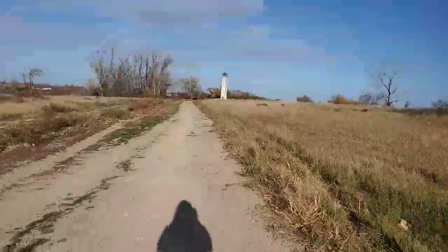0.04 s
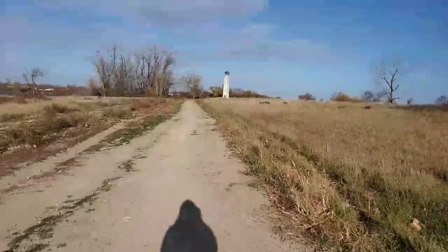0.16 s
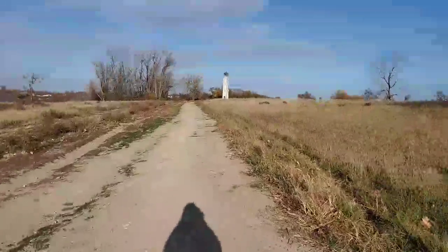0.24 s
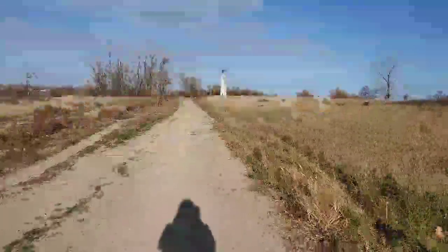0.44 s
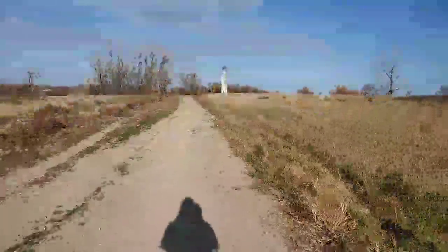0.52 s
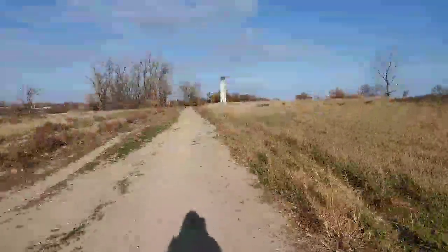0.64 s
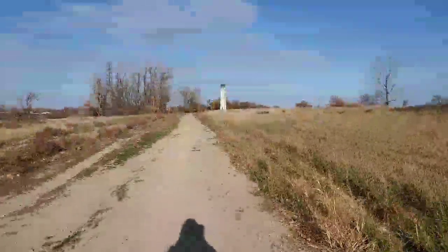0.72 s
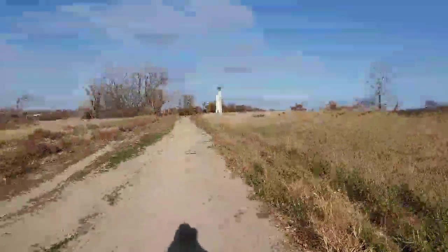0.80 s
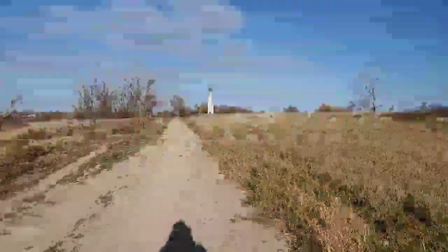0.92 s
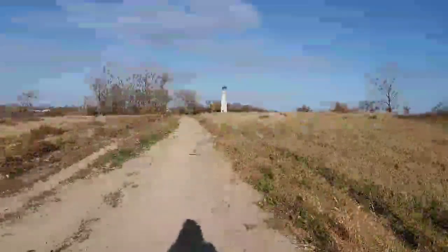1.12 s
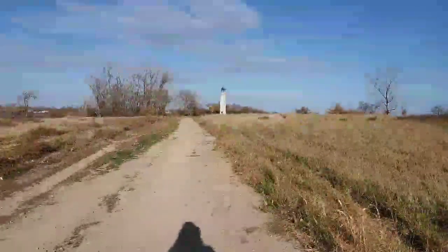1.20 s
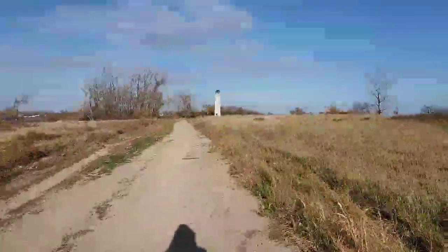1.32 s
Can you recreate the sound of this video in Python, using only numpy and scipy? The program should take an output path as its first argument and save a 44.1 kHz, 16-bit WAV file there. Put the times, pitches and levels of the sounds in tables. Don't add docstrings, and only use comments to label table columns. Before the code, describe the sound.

Gusty wind rumbles, flutters and thumps on a handheld stereo microphone outdoors, jumping between sides, while shoes scrape sandy grit beneath; a stone cracks sharply midway, then the wind drops to faint grass hiss and a last scuff.

```python
import sys
import numpy as np
from scipy import signal
from scipy.fft import rfft, irfft, next_fast_len
from scipy.io import wavfile
from scipy.ndimage import uniform_filter1d

SR = 44100
rng = np.random.default_rng(int(sys.argv[2]) if len(sys.argv) > 2 else 0)


def master_out(mix):
    frames = np.transpose(np.atleast_2d(mix))
    ceiling = np.clip(frames, -1, 1)
    pcm = np.round(ceiling * 32767).astype(np.int16)
    wavfile.write(sys.argv[1], SR, pcm)


def how_loud(loudness_db):
    steps = np.asarray(loudness_db, float) / 20
    return 10 ** steps


N = 59535


def evened(x):
    return x / np.sqrt(np.mean(x ** 2) + 1e-20)


def colour(x, points):
    size = next_fast_len(x.shape[-1] + 4096)
    f, level = np.transpose(points)
    hz = np.fft.rfftfreq(size, 1 / SR)
    gain = how_loud(np.interp(np.log(hz + 1), np.log(f + 1), level))
    return irfft(rfft(x, size) * gain, size)[..., :x.shape[-1]]


def curve(table, col):
    rows = np.array(table)
    return np.interp(np.arange(N) / SR, rows[:, 0], rows[:, col])


def slow(hz):
    noise = rng.standard_normal((2, N))
    return evened(colour(noise, [(1, 0), (hz, -3), (4 * hz, -40), (20000, -150)]))


def lean(db):
    half = np.asarray(db) / 2
    return how_loud(np.array([half, -half]))


def add(mix, s, sound):
    part = mix[:, max(round(s * SR), 0):][:, :sound.shape[1]]
    part += sound[:, :part.shape[1]]


def ring(x, hz, width):
    r = np.exp(-np.pi * width / SR)
    angle = 2 * np.pi * hz / SR
    return signal.lfilter([np.sin(angle)], [1, -2 * r * np.cos(angle), r * r], x)


def wind():
    # (time [s], gust level [dB], left-right lean [dB], rumble over tone [dB])
    gusts = [(0, -55.5, 7, 19), (.022, -39.5, -17, -13), (.13, -42, -15, -4), (.176, -40.5, 3, 4),
             (.235, -34, -24, -20), (.33, -32.5, 12, 3), (.39, -31.5, -18, -0.5), (.435, -41, 17, 3),
             (.52, -42, -11.5, 9), (.608, -41, 18, 3), (.69, -32.5, 7, 0.5), (.79, -44.5, -13, 13.5),
             (.85, -43.5, 17, 5.5), (.9, -65.5, 14, 10), (.96, -51.5, 15, 3), (1.01, -62.5, -5, 16),
             (1.05, -72, -26.5, -4.5), (1.35, -78.5, -9.5, 12)]
    # (frequency [Hz], level [dB])
    port_tone = [(90, -52), (150, -6.5), (300, 0.5), (400, 0.5), (560, -8), (1000, -20), (2000, -35),
                 (4000, -71)]
    # (frequency [Hz], level [dB])
    rumble = [(20, -18), (35, -13), (65, -2), (100, -4.5), (160, -7.5), (260, -16.5), (500, -69)]
    flutter_db, lump_db, rumble_db = 3.5, 2.5, -2
    tone = evened(colour(rng.standard_normal((2, N)), port_tone))
    tone *= how_loud(flutter_db * slow(hz=28.8) + 3.5)
    low = evened(colour(rng.standard_normal((2, N)), rumble))
    low *= how_loud(lump_db * slow(hz=35.8) + rumble_db + curve(gusts, col=3))
    side = curve(gusts, col=2)
    return how_loud(curve(gusts, col=1)) * (tone * lean(.2 * side) + low * lean(.8 * side))


def lumps(tables, cycles, skirt_db):
    out, t = np.zeros((2, N)), np.arange(-1500, 1500) / SR
    middle = len(t) // 2
    for port, table in enumerate(tables):
        for s, db, hz in table:
            phase = rng.random()
            skirt = [(hz / 2, -20), (hz, 0), (2.11 * hz, -3), (6 * hz, -35), (30 * hz, -90)]
            rough = evened(colour(rng.standard_normal(len(t)), skirt))
            swell = np.exp(-(t * hz / cycles) ** 2)
            lump = swell * (np.cos(2 * np.pi * (hz * t + phase)) + how_loud(skirt_db) * rough)
            first = round(s * SR) - middle
            start = max(first, 0)
            add(out[port:port + 1], start / SR, how_loud(db) * lump[None, start - first:])
    return out


def thumps():
    # (time [s], peak level [dB], frequency [Hz])
    left_thumps = [(0.005, -37, 70), (0.08, -44, 70), (0.18, -35, 78.4), (0.34, -22, 89), (.35, -16, 151),
                   (0.3851, -26, 60), (0.485, -21.5, 103), (0.56, -24.5, 62), (0.655, -19.5, 74.4),
                   (0.7381, -27, 94), (0.80, -29, 78), (0.8386, -30, 60), (.9, -41, 70), (0.9968, -41, 80),
                   (1.135, -47, 73), (1.245, -71, 60), (1.34, -57, 65)]
    right_thumps = [(0.0268, -29.5, 55), (0.082, -29, 63), (0.15, -29, 73), (0.233, -23, 63.6),
                    (0.289, -29, 54), (0.374, -22, 86.5), (0.371, -20, 192), (0.494, -24.5, 110),
                    (0.556, -28, 64.5), (0.649, -25.5, 75), (0.721, -21.5, 57.7), (0.781, -30, 68),
                    (.992, -39.5, 66), (1.09, -52, 54), (1.259, -51.5, 60.7), (1.33, -53, 84)]
    return how_loud(-2.5) * lumps([left_thumps, right_thumps], cycles=1.16, skirt_db=-8.5)


def eddies():
    # (time [s], peak level [dB], frequency [Hz])
    left_eddies = [(0.0124, -27.5, 404), (0.198, -20, 597), (0.2296, -15.5, 438), (0.2381, -17.5, 433),
                   (0.3485, -18, 394), (0.3645, -2, 374), (0.47, -15.5, 375), (0.4817, -26, 380),
                   (0.4915, -28, 320), (0.5256, -27.5, 656), (0.6361, -19.5, 290), (0.644, -18.5, 560),
                   (0.6548, -10.5, 382), (0.668, -18.5, 524), (0.6787, -7, 300), (0.6876, -14, 370),
                   (0.7651, -20, 350), (.6942, -15, 446)]
    right_eddies = [(0.2284, -16.5, 390), (0.2461, -20, 530), (0.2792, -20, 420), (0.2991, -18.5, 337),
                    (0.3459, -13.5, 374), (0.358, -9.5, 430), (0.3664, -10.5, 347), (0.3732, -11, 378),
                    (0.3867, -32, 364), (0.4829, -15.5, 340), (0.4926, -18, 363), (0.5246, -20, 543),
                    (0.6465, -12, 447), (0.6671, -11, 410), (0.6783, -11, 360), (0.686, -22, 293),
                    (0.7751, -20, 281), (.6725, -7, 370)]
    return how_loud(-0.5) * lumps([left_eddies, right_eddies], cycles=1, skirt_db=-14.5)


def flicks():
    # (time [s], peak level [dB], frequency [Hz])
    left_flicks = [(.075, -32, 487), (.092, -27.5, 590), (.204, -18.5, 600), (.347, -24, 900),
                   (.4915, -22, 654), (.64, -24, 790), (.66, -26, 750), (.7665, -33, 600)]
    right_flicks = [(.094, -27.5, 580), (.128, -42, 1000), (0.21, -21.5, 590), (.429, -30, 620),
                    (.583, -31.5, 550), (.278, -21.5, 530), (.6445, -23.5, 1130), (.59, -33, 690),
                    (0.66, -40, 950), (.879, -31.5, 630)]
    return lumps([left_flicks, right_flicks], cycles=1.26, skirt_db=-15.5)


def sand():
    # (time [s], level [dB])
    scuff = [(0, -63), (.06, -59.5), (.19, -60.5), (.23, -56.5), (.37, -55), (.42, -62.5), (.63, -62),
             (.66, -55), (.69, -66), (.86, -66), (.91, -65.5), (.99, -62), (1.03, -77.5), (1.3, -76),
             (1.35, -56)]
    # (frequency [Hz], level [dB])
    sand_spectrum = [(530, -14.5), (900, -21.5), (2040, -16), (2630, -21), (3150, -17), (4980, -19.5),
                     (7960, -20), (14500, -24), (16000, -59.5)]
    grains_per_s, grain_db = 2700, -11.5
    same = 0.066
    a, b = rng.standard_normal((2, N))
    hiss = np.array([a, same * a + np.sqrt(1 - same ** 2) * b])
    grains = (rng.random(N) < grains_per_s / SR) * rng.choice([-1, 1], N)
    grains = grains * how_loud(6.0 * np.minimum(rng.exponential(1, N), 4))
    scattered = evened(grains) * lean(4 * rng.standard_normal(N))
    mix = hiss * how_loud(2.1 * slow(hz=24.4)[0]) + how_loud(grain_db) * scattered
    return evened(colour(mix, sand_spectrum)) * how_loud(curve(scuff, col=1) + 4.0)


def scrapes():
    # (time [s], length [s], level [dB], top frequency [Hz])
    slides = [
        (0.219, 0.067, -53, 3620),
        (0.27, .09, -51.5, 2040),
        (0.382, 0.023, -45, 3700),
        (0.422, 0.076, -53.5, 2210),
        (0.516, 0.035, -55, 4320),
        (.635, 0.019, -36, 1190),
        (0.824, 0.087, -56.5, 3160),
        (0.876, 0.011, -52, 1510),
        (1.305, 0.026, -62, 1510),
    ]
    crumb_db = 3
    out = np.zeros((2, N))
    for s, length, db, top_hz in slides:
        t = np.arange(round(length * SR)) / SR
        noise = rng.standard_normal((4, 4000))[:, :len(t)]
        crumbs = how_loud(crumb_db * evened(uniform_filter1d(noise[3], size=60)))
        grit = (0.99 * noise[0] + noise[1:3]) * crumbs
        grit = colour(grit, [(350, -30), (700, -3), (top_hz, 0), (1.3 * top_hz, -18), (16000, -40)])
        add(out, s, how_loud(db) * evened(grit) * np.sin(np.pi * t / length) ** 1.2)
    return out


def snaps():
    # (time [s], peak level [dB], left-right lean [dB], brightness [dB per octave])
    crushes = [
        (0.2325, -36, 0, -4),
        (0.254, -28, -3.5, -7),
        (0.3938, -30, -2, -1.5),
        (.642, -35, -2, -3.5),
        (0.659, -43, 0, -1),
        (0.8396, -42, 0, -9),
        (.876, -39, 0, -11),
    ]
    rise_s, fall_s = .0002, .0005
    out, t = np.zeros((2, N)), np.arange(600) / SR
    for s, db, pan_db, tilt_db in crushes:
        noise = rng.standard_normal((3, len(t)))
        burst = noise[0] + .5 * noise[1:]
        burst = burst * np.minimum(t / rise_s, 1) * np.exp(-t / fall_s)
        burst = colour(burst, [(300, -24.0), (1200, 2), (16000, 4 * tilt_db)])
        add(out, s, how_loud(db) * lean(pan_db)[:, None] * burst / abs(burst).max())
    return out


def ticks():
    # (time [s], peak level [dB], left-right lean [dB], frequency [Hz])
    clicks = [(.0146, -48, 9, 3640), (0.03, -48, 4, 2500), (.038, -50, 4, 2340), (0.0608, -44, 8, 4200),
              (0.072, -49.5, 4, 3900), (0.402, -42, -11, 1500), (.414, -40, -12, 2200),
              (0.436, -37, -3, 1930), (.497, -43, -3, 2600), (0.581, -44, -1, 1700),
              (0.8334, -42.5, 4, 1510), (0.8397, -40.5, -3, 2980), (.846, -49, 0, 3300),
              (.85, -46, 2, 1200), (.858, -48, 0, 2400), (0.8746, -41, 1, 2820), (.878, -46, 0, 1690),
              (.9715, -50, -1, 1750), (1.184, -52.5, 0, 5000), (1.302, -54.5, 0, 1800),
              (1.315, -52, 3, 880)]
    t60_cycles = 7.6
    decay = np.exp(-np.arange(400) / (.0005 * SR))
    out = np.zeros((2, N))
    for s, db, pan_db, hz in clicks:
        hit = rng.standard_normal(400) * decay
        tick = ring(hit, hz, 2.2 * hz / t60_cycles)
        add(out, s, how_loud(db) * lean(pan_db)[:, None] * tick / abs(tick).max())
    return out


def crack():
    # (time [s], peak level [dB], left-right lean [dB])
    splits = [
        (0.5232, -14.5, 5),
    ]
    # (frequency [Hz], width [Hz], level [dB])
    crack_modes = [(593, 400, 0), (1060, 150, 3), (2096, 116, -0.5), (3300, 820, 0), (5790, 550, -2),
                   (7500, 300, -1.5), (14500, 2300, -18.5)]
    lag_s = .0004
    out = np.zeros((2, N))
    for s, db, pan_db in splits:
        hit = np.zeros((2, 900))
        for delay, size in [(.0004, 0.69), (.0008, 0.14), (.0015, 0.2)]:
            hit[0, round((delay + lag_s) * SR)] = -size
            hit[1, round(delay * SR)] = size
        modes = sum(how_loud(level) * width / 500 * ring(hit, hz, width) for hz, width, level in crack_modes)
        add(out, s, how_loud(db + 5.0) * lean(pan_db)[:, None] * modes / abs(modes).max())
    return out


def insects():
    # (time [s], length [s], level [dB], frequency [Hz])
    chirps = [(0.046, 0.026, -64, 7020), (0.107, 0.07, -63.5, 7900), (0.272, 0.029, -62, 3980),
              (0.397, 0.085, -65, 7920), (.425, 0.035, -63.5, 3900), (0.709, 0.029, -66.5, 3980),
              (0.763, 0.13, -66.5, 7920), (0.782, .08, -64, 7060), (1.088, 0.12, -79, 7880),
              (1.187, 0.13, -74, 7100), (1.24, .08, -74, 14500)]
    throb_hz, throb_db, width_hz = 90, 4.5, 180
    out = np.zeros((2, N))
    for s, length, db, hz in chirps:
        t = np.arange(round(length * SR)) / SR
        fizz = ring(rng.standard_normal((2, len(t))), hz, width_hz)
        fizz = evened(ring(fizz, hz, width_hz))
        throb = how_loud(db + throb_db * np.sin(2 * np.pi * throb_hz * t))
        add(out, s, throb * fizz * np.sin(np.pi * t / length) ** 0.19)
    return out


def air():
    # (frequency [Hz], level [dB])
    grass = [(88, -35.5), (150, -19), (475, 2), (1940, -4.5), (2760, -15.5), (7770, -3), (10400, -26),
             (11900, -12.5), (16000, -7.5)]
    hiss = evened(colour(rng.standard_normal((2, N)), grass))
    return how_loud(-63) * hiss * how_loud(1.7 * slow(hz=22)[0])


def scene():
    weather = wind() + thumps() + eddies() + flicks()
    steps = sand() + scrapes() + snaps() + ticks() + crack()
    return weather + steps + insects() + air()


def top_cut(x):
    return signal.sosfilt(signal.butter(12, 16490, fs=SR, output="sos"), x)


def record(dry):
    # (frequency [Hz], level [dB])
    cavity = [(1400, -0.5), (2000, 1.5), (2550, 0.5), (3700, 1.5), (4800, 0.5), (5700, 0)]
    # (frequency [Hz], level [dB])
    mic = [(20, 0), (9300, 0), (10600, -8), (11800, 0), (16200, 0), (16600, -60)]
    return top_cut(colour(colour(dry, cavity), mic))


dry = scene()
out = record(dry)
master_out(out)
```